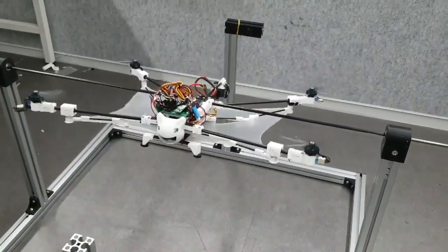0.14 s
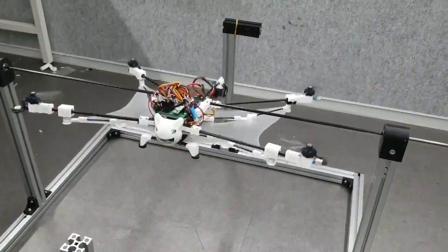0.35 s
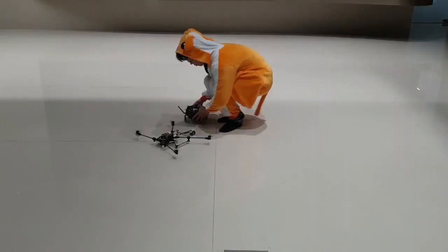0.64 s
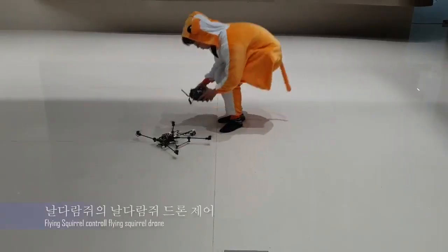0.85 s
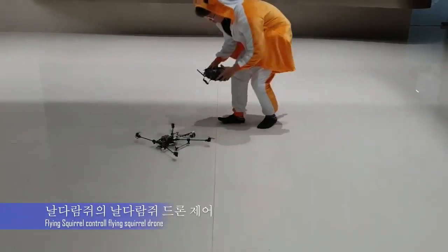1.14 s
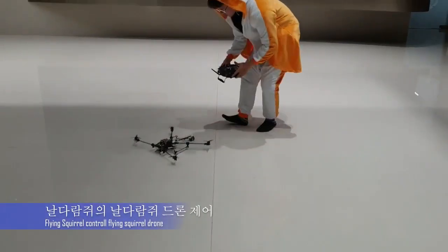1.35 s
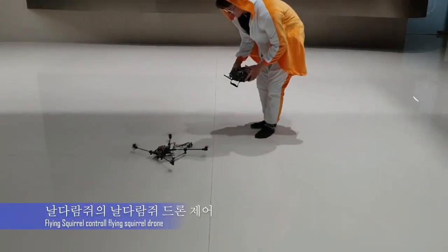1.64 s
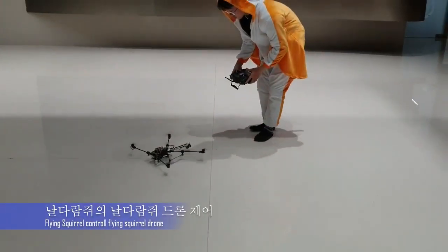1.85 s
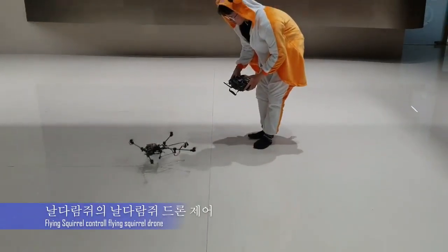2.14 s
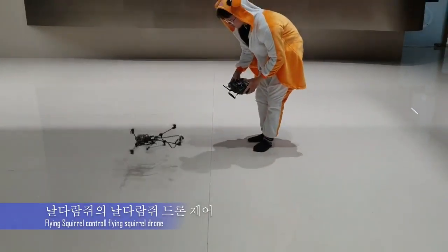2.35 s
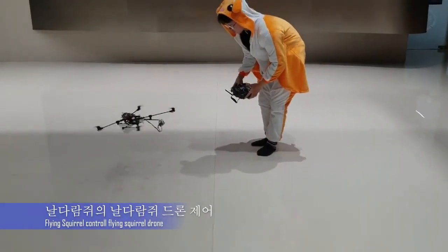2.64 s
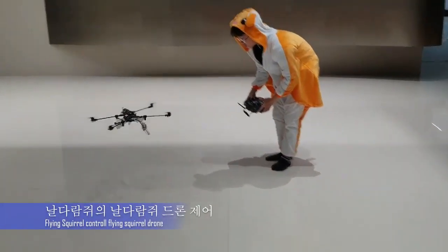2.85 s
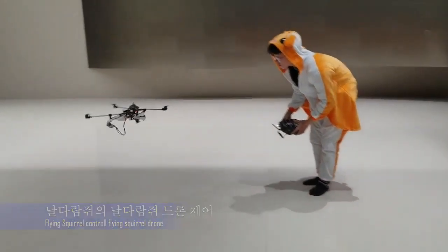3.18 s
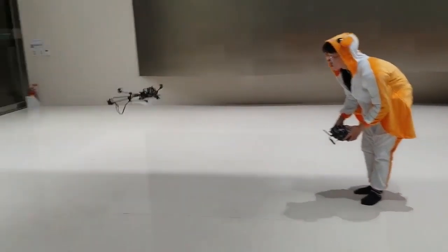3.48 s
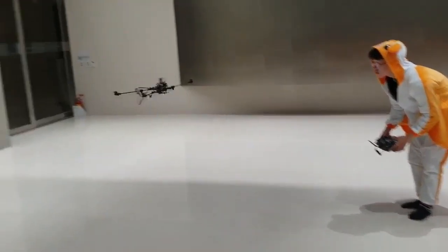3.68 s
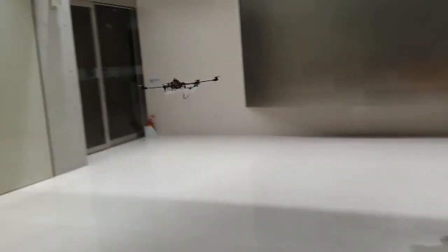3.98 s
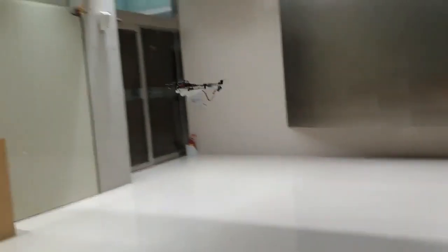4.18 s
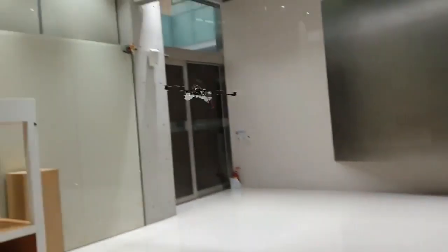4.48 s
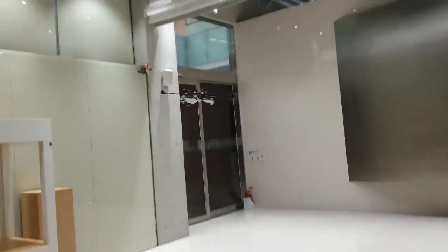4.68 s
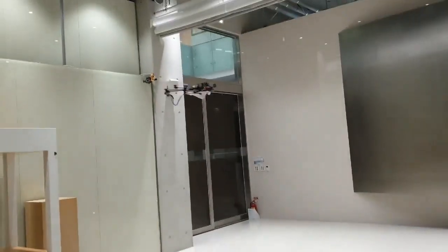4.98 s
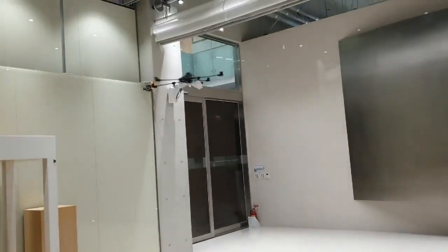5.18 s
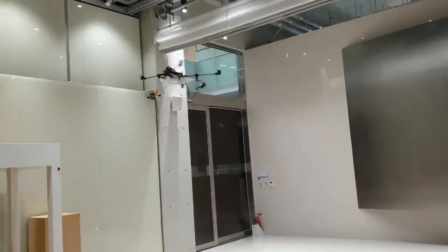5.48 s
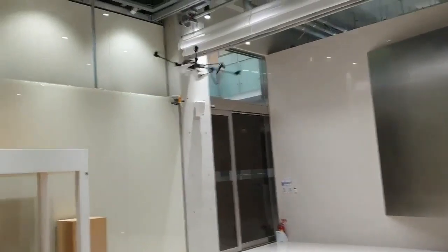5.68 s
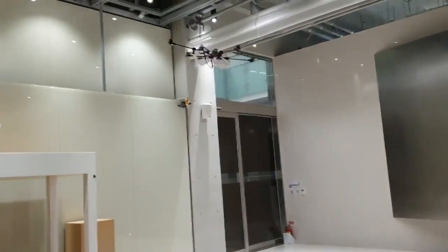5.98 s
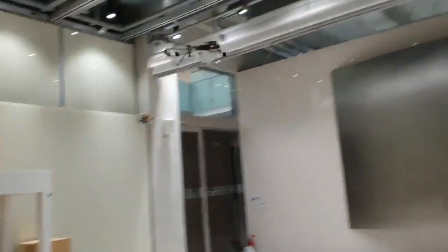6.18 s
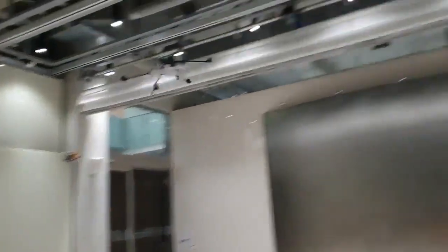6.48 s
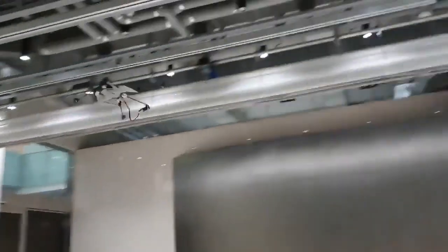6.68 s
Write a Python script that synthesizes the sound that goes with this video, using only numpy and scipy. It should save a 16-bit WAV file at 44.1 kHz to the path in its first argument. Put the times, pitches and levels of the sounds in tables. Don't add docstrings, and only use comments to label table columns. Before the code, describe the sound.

A four-rotor drone buzzes close to the microphone, its unsteady whine covered by bright hiss, then cuts off abruptly. In a large hard-walled hall, faint ventilation, hum and motor whine remain, with one tiny rotor blip. The rotors then spin up rapidly into a loud whining buzz, lift off and settle into wavering flight with airy hiss. A firm low handling thud comes near the end, and flight continues to the cut.

```python
import sys
import numpy as np
from scipy import signal
from scipy.fft import rfft, irfft
from scipy.io import wavfile

SR = 44100
rng = np.random.default_rng(int(sys.argv[2]) if len(sys.argv) > 2 else 0)


def transcribe(signal):
    frames = np.atleast_2d(signal).T
    limited = np.clip(frames, -1, 1)
    pcm = np.round(limited * 32767).astype(np.int16)
    wavfile.write(sys.argv[1], SR, pcm)


def gain_from_db(level_db):
    decades = np.asarray(level_db, float) / 20
    return 10 ** decades


N = 301203
TIME = np.arange(N) / SR
HZ = np.maximum(np.fft.rfftfreq(N + 1, 1 / SR), 1)
HOVER_DB = -32.5
LIFT_S = 2.67

# time_s, loudness_db
FLIGHT = [(1.45, -86.5), (1.57, -57.5), (1.66, -44), (1.78, -33.5), (1.92, -29), (2.15, -29.5), (2.5, -30),
          (2.78, -31.5), (3.05, -34), (3.45, -34.5), (4.15, -34.5), (4.6, -35), (5.1, -34.5), (5.35, -33.5),
          (5.58, -31.5), (6.1, -32.5), (6.55, -32.5), (6.83, -32.5)]


def rms_one(x):
    return x / np.sqrt(np.mean(x ** 2) + 1e-20)


def in_time(rows):
    s, *columns = np.transpose(rows)
    return [np.interp(TIME, s, column) for column in columns]


def at_hz(points, hz):
    pitch_hz, level_db = np.transpose(points)
    return np.interp(np.log(hz), np.log(pitch_hz), level_db, left=-90, right=-90)


def ramp(s, length_s):
    return np.clip((TIME - s) / length_s + .5, 0, 1)


def bells(events):
    return sum(height * np.exp(-(2 * (TIME - s) / length) ** 2) for s, length, height in events)


def drift(rate):
    r = np.exp(-80 * np.pi * rate / SR)
    slow = signal.lfilter([1], [1, -2 * r, r * r], rng.standard_normal(N // 40 + 2002))[2000:]
    return np.interp(np.arange(N) / 40, np.arange(len(slow)), rms_one(slow - slow.mean()))


def stereo_white():
    # pitch_hz, likeness (1 is the same)
    likeness = [(30, 0.2), (60, 0.72), (130, 0.96), (290, 0.92), (640, 0.33), (1410, 0.18), (3100, 0.04),
                (6820, -0.02), (15000, -0.0)]
    pitch_hz, share = np.transpose(likeness)
    alike = np.clip(np.interp(np.log(HZ), np.log(pitch_hz), share), 0, 1)
    mid, side = rfft(rng.standard_normal((2, N + 1)))
    return np.sqrt(1 + alike) * mid + np.sqrt(1 - alike) * side * [[1], [-1]]


def air(colour, gust_db, patchy_db):
    spectrum = stereo_white() * gain_from_db(at_hz(colour, HZ))
    gust = drift(10.0)
    low, high = np.log2(colour[0][0]), np.log2(colour[-1][0])
    out = 0
    for octave in np.arange(low, high + 1):
        band = np.clip(1 - np.abs(np.log2(HZ) - octave), 0, 1)
        noise = irfft(spectrum * band, N + 1)[:, :N]
        out = out + noise * gain_from_db(gust_db * gust + patchy_db * drift(14.0))
    return rms_one(out)


def reverb(x, t60_s, wet_db):
    shares = np.array([drift(1.5) for _ in range(3)])
    shares = shares / np.sqrt(np.sum(shares ** 2, axis=0))
    wet = 0
    for share in shares:
        tail = irfft(stereo_white(), N + 1)[:, :SR] * gain_from_db(-60 * TIME[:SR] / t60_s)
        tail = tail / np.sqrt(np.mean(np.sum(tail ** 2, axis=1)))
        wet = wet + signal.oaconvolve((x * share)[None], tail, axes=1)[:, :N]
    direct = np.array([x, np.roll(x, 2)])
    return (direct + gain_from_db(wet_db) * wet) / np.sqrt(1 + gain_from_db(2 * wet_db))


def rotor(blade_hz, orders, trim, flutter_db):
    speed = blade_hz * (1 + trim * (.6 * drift(8) + drift(30)))
    turn = 2 * np.pi * (np.cumsum(speed) / SR + rng.random())
    out = 0
    for k, db in orders:
        level = np.sqrt(2) * gain_from_db(db + flutter_db * k ** .3 * drift(20 * k))
        out = out + level * np.sin(k * turn + k * k)
    return out


def frame_drone():
    # time_s, blade_hz, level_db
    fast = [(0, 927, -34), (0.051, 860, -38.5), (.1, 880, -36), (.14, 902, -36), (.18, 869, -39),
            (.25, 848, -31), (.3, 881, -40), (.38, 900, -41.5), (.42, 865, -41), (.46, 836, -33.5),
            (.5, 852.5, -40.5), (.54, 890, -40.5), (.58, 929, -35.5), (.63, 903, -37.5), (.67, 898, -45),
            (.72, 906, -47.5)]
    slow = [(0, 822.4, -36), (.06, 799.4, -37), (.1, 762.4, -44), (.15, 770, -49.5), (.2, 733, -47),
            (.26, 756, -44), (0.301, 771, -44.5), (.34, 782, -44.5), (.4, 759, -48.5), (.46, 774, -40.5),
            (.5, 766, -40.5), (.54, 701, -46.5), (.59, 619.5, -46.5), (0.628, 703, -46), (.67, 737, -44),
            (.72, 795, -42)]
    middle = [(0, 780, -50), (.08, 745, -45), (.14, 827, -43), (.22, 900, -56.5), (.3, 838, -43),
              (.38, 841, -41.5), (0.419, 927, -45.5), (.5, 903, -52.5), (.54, 922, -45), (.58, 798, -51.5),
              (.62, 779, -39.5), (.66, 819, -37.5), (0.722, 858, -40.5)]
    # multiple of the blade rate, level_db
    blade_orders = [(1, -0.5), (2, -4), (3, -2.5), (4, -5.5), (5, -2.5), (6, -3), (7, -6)]
    shaft_orders = [(1 / 3, -27), (2 / 3, -20), (4 / 3, -23), (5 / 3, -18), (8 / 3, -15)]
    # pitch_hz, level_db
    hiss_colour = [(700, -22.5), (1200, -21.5), (2000, -10.5), (2900, -9), (3800, -6.5), (5500, -2.5),
                   (7000, 0), (8200, -3), (12000, -1.5), (15500, -1)]
    wash_colour = [(15, -47), (25, -17.5), (65, -4.5), (220, -12), (279, -9.5), (530, -14), (700, -5),
                   (910, -24), (1540, -120)]
    tones = 0
    for track, over_db in ((fast, -2), (slow, -2), (middle, 1)):
        hz, db = in_time(track)
        orders = [(k, level_db + over_db * (k > 1)) for k, level_db in [*blade_orders, *shaft_orders]]
        tones = tones + gain_from_db(db - 0.5) * rotor(hz, orders, trim=.008, flutter_db=4.0)
    swing_db = 1 * ramp(.35, 0.17)
    hiss = gain_from_db(-22 + swing_db) * air(hiss_colour, gust_db=.3, patchy_db=.7)
    wash = gain_from_db(-52) * air(wash_colour, gust_db=1.5, patchy_db=3.0)
    cut_s, step_db, fade_s, tones_duck_db = .7125, -7, .0185, -8.5
    cut = np.where(TIME < cut_s, 1, gain_from_db(step_db) * np.clip(1 - (TIME - cut_s) / fade_s, 0, 1))
    tones = reverb(tones * (TIME < .74), t60_s=.3, wet_db=-1) * gain_from_db(tones_duck_db * (TIME > cut_s))
    return (tones + hiss + wash) * cut


def above_hover_db():
    return in_time(FLIGHT)[0] - HOVER_DB


def room_air():
    # pitch_hz, level_db
    vent_colour = [(20, -14), (35, -10), (58, 2), (75, 2), (95, 0), (150, 0), (220, -40)]
    still_colour = [(150, -16), (200, -7.5), (235, 5), (300, -4), (550, -13.5), (1000, -24), (1700, -19.5),
                    (4000, -26), (8000, -40), (9500, -35), (12000, -30), (15000, -34)]
    stirred = gain_from_db(np.minimum(above_hover_db(), 0) / 2)
    vent = gain_from_db(-72 + 10 * stirred) * air(vent_colour, gust_db=-2.5, patchy_db=5.5)
    return vent + gain_from_db(-73) * air(still_colour, gust_db=.5, patchy_db=.5)


def mains_hum():
    stirred = gain_from_db(np.minimum(above_hover_db(), 0) / 2)
    hum_db = -80 + 12.5 * stirred + 7 * ramp(3.234, 0.54)
    wave = np.sin(2 * np.pi * 120 * TIME + np.array([[0], [.35]]))
    return np.sqrt(2) * gain_from_db(hum_db + 2.4 * drift(7.4)) * wave


def idle_motors():
    # pitch_hz, width_hz, level_db
    whines = [(1240, 80, -92), (1776, 200, -88)]
    # pitch_hz, level_db
    switching = [(10110, -94), (14000, -84)]
    whine = 0
    for hz, width_hz, db in whines:
        line = stereo_white() / (1 + ((HZ - hz) / width_hz * 2) ** 2)
        whine = whine + gain_from_db(db + 3.0 * drift(8)) * rms_one(irfft(line, N + 1)[:, :N])
    lines = 0
    for hz, db in switching:
        wave = np.sin(2 * np.pi * hz * TIME + np.array([[0], [1.2]]))
        lines = lines + gain_from_db(db + 3 + 1.5 * drift(15)) * wave
    resting = ramp(1.26, .15) - ramp(1.48, .15)
    blip_db = bells([(1.035, .3, 6)])
    return whine * gain_from_db(10 + blip_db - 17.5 * resting) + lines


def rotor_air():
    # pitch_hz, level_db
    hiss_colour = [(2500, -12.5), (3500, -13), (5000, -2), (7400, 2), (8200, -2.5), (12000, 0.5),
                   (15500, 0)]
    rush_colour = [(800, -11), (1100, -8), (2100, -8), (2600, -3), (3500, -2.5), (4500, -4.5),
                   (6000, -16.5)]
    wash_colour = [(130, -28), (200, 0.5), (350, 0), (600, 2.5), (750, 5.5), (1000, -15.5)]
    blip_s, rise_db_per_s, fall_db_per_s = 1.035, 87, 107
    blip = gain_from_db(-57.5 + np.minimum(rise_db_per_s * (TIME - blip_s), fall_db_per_s * (blip_s - TIME)))
    swing_db = above_hover_db()
    extra_db = np.maximum(swing_db, 0)
    thrust_db = np.minimum(swing_db, 0) + 0.54 * (TIME - LIFT_S)
    hiss = (gain_from_db(HOVER_DB + swing_db) + blip * gain_from_db(-3)) * gain_from_db(4.0)
    ground_db = -1.5 * (1 - ramp(3.4, 1))
    rush = gain_from_db(-37 + ground_db + thrust_db + 0.9 * extra_db) + blip
    wash = gain_from_db(-50.5 + thrust_db + 0.11 * extra_db)
    return (hiss * air(hiss_colour, gust_db=0.5, patchy_db=.9)
            + rush * air(rush_colour, gust_db=0.4, patchy_db=1.5)
            + wash * air(wash_colour, gust_db=1.0, patchy_db=3.0))


def hall_rotors():
    # time_s, loaded_pair_hz, level_db, light_pair_hz, level_db
    spin_up = [
        (1.45, 420, -110, 415, -112),
        (1.57, 540, -75, 527.5, -77),
        (1.66, 660, -51, 625, -64.5),
        (1.769, 809.4, -41, 749.5, -36),
    ]
    # time_s, blade_hz, level_db
    loaded_pair = [(1.84, 881.5, -35), (1.89, 899, -41), (1.96, 906, -34), (2.01, 908, -31),
                   (2.11, 944.6, -45), (2.18, 941, -31.5), (2.25, 937, -46), (2.31, 929, -34.5),
                   (2.5, 920, -40), (2.56, 920, -33.5), (2.61, 922, -36), (2.72, 913, -42),
                   (2.78, 914, -40), (2.83, 917, -37), (2.92, 907.5, -38), (3.03, 912, -38),
                   (3.13, 908.6, -42.5), (3.18, 911, -38.5), (3.23, 919, -46), (3.27, 912, -38),
                   (3.35, 934, -40.5), (3.41, 937, -49), (3.49, 937, -37.5), (3.57, 921, -38.5),
                   (3.7, 919, -39), (3.74, 946, -48), (3.79, 947, -39), (3.94, 944, -42), (4.0, 925, -43),
                   (4.04, 926, -45), (4.09, 932, -36), (4.18, 929.4, -39.5), (4.33, 931, -41),
                   (4.37, 916, -41), (4.47, 907, -40), (4.58, 913, -41.5), (4.64, 909, -42),
                   (4.7, 906, -42), (4.77, 904.6, -43), (4.88, 897.6, -40), (5.03, 892, -35),
                   (5.12, 887, -48), (5.24, 885, -42.5), (5.31, 886, -45), (5.35, 890.5, -34.5),
                   (5.4, 896, -42), (5.46, 910, -40), (5.53, 920.4, -33.5), (5.6, 927, -33),
                   (5.78, 931.4, -44), (5.87, 933.5, -36.5), (5.95, 935, -44), (6.08, 937.5, -31.5),
                   (6.24, 939, -38), (6.3, 933, -30.5), (6.37, 937, -39), (6.46, 935, -44),
                   (6.52, 920.4, -30), (6.58, 897, -33.5), (6.8, 896, -51.5)]
    light_pair = [(1.84, 764, -37), (1.91, 799, -39), (2.05, 829, -34.5), (2.13, 832, -36),
                  (2.26, 816, -45.5), (2.33, 824, -39), (2.45, 824, -44), (2.49, 807, -35),
                  (2.55, 807, -33.5), (2.71, 802, -39), (2.81, 805, -33), (2.86, 816, -44.5),
                  (2.92, 821, -40), (3.09, 821, -40.5), (3.13, 810, -43), (3.2, 810, -48), (3.25, 832, -44),
                  (3.35, 832, -42), (3.45, 805, -41), (3.53, 805, -43), (3.57, 805, -47), (3.62, 805, -43),
                  (3.68, 805, -43), (3.73, 805, -41), (3.98, 816, -49), (4.04, 851, -41),
                  (4.08, 851, -38.5), (4.15, 821, -40.5), (4.2, 821, -46.5), (4.29, 821, -40),
                  (4.38, 834, -41), (4.43, 834, -43), (4.5, 826, -45), (4.54, 824, -46), (4.67, 797, -42),
                  (4.73, 797, -46.5), (4.77, 786, -49), (4.84, 786, -38.5), (4.94, 778, -50),
                  (5.078, 781, -45.5), (5.14, 799, -40), (5.23, 786, -40.5), (5.27, 786, -53),
                  (5.39, 797, -37), (5.46, 829, -41.5), (5.56, 829, -36.5), (5.62, 837, -39),
                  (5.74, 824, -42.5), (5.79, 821, -33.5), (5.95, 816, -57.5), (6.08, 821, -38),
                  (6.26, 810, -45), (6.328, 829, -46), (6.37, 832, -45), (6.43, 832, -37), (6.5, 832, -47),
                  (6.6, 840, -36), (6.69, 834, -44), (6.74, 834, -49), (6.8, 834, -46)]
    # time_s, length_s, rise_db
    loaded_wobbles = [(3.42, .2, 21), (4.1, 0.46, 21), (4.42, .2, 15.5), (5.421, 0.42, 19), (5.717, .2, 11),
                      (6.183, 0.34, 17), (6.498, 0.19, 17.5), (6.749, 0.15, 15)]
    light_wobbles = [(1.8, .25, 20), (2.05, 0.25, 14), (2.7, 0.5, 17), (3.2, .3, 8), (3.42, 0.17, 14),
                     (3.85, 0.38, 18), (4.2, 0.41, 19), (4.55, 0.28, 15), (4.8, 0.32, 21.3),
                     (5.32, 0.39, 12.95), (5.95, 0.49, 14), (6.3, 0.29, 14.1), (6.55, 0.29, 14)]
    # time_s, length_s, share of speed
    loaded_strays = [(2.197, 0.31, .03), (2.599, 0.29, .04), (3.602, .3, -.035), (3.852, .2, -.04),
                     (4.749, 0.19, -.03), (6.701, .15, .05)]
    light_strays = [(1.88, .12, -0.067), (2.2, .4, -.06), (2.86, .36, -.075), (3.7, .2, .04),
                    (4.1, .3, -.05), (5.4, .15, -.06), (5.6, .15, -.05), (6.72, 0.34, -.05)]
    # multiple of the blade rate, level_db
    loaded_orders = [(2, -2), (3, -4), (4, -5), (5, -6), (6, -8), (7, -9)]
    light_orders = [(2, 1), (3, -1), (4, -3), (5, -4), (6, -6), (7, -6)]
    shaft_orders = [(2 / 3, -26), (4 / 3, -21), (5 / 3, -16), (7 / 3, -16), (8 / 3, -15)]
    loud_db, = in_time(FLIGHT)
    spool_db = np.minimum(loud_db - HOVER_DB, 0)
    effort_db = loud_db - 9 + 0.26 * spool_db
    floor_db, free_db, climb_db_per_s = -3.5, -14, -27
    climb_db = np.clip(floor_db + climb_db_per_s * (TIME - LIFT_S), free_db, floor_db)
    overtones_db = effort_db + climb_db + 0.33 * spool_db
    tones = 0
    for column, pair, wobbles, strays, overtones in (
            (1, loaded_pair, loaded_wobbles, loaded_strays, loaded_orders),
            (3, light_pair, light_wobbles, light_strays, light_orders)):
        hz, blade_db = in_time([(row[0], *row[column:column + 2]) for row in spin_up] + list(pair))
        imbalance_db = effort_db - 28.5 + bells(wobbles) + 2.5 * drift(8.1)
        orders = [(1, blade_db - 1), (1 / 3, imbalance_db)]
        orders += [(k, effort_db + db) for k, db in shaft_orders]
        orders += [(k, overtones_db + db) for k, db in overtones]
        partner_stray = .02 * drift(4) + bells(strays)
        for stray, own_db in ((0, 0), (partner_stray, -3.5)):
            own_orders = [(k, db + own_db) for k, db in orders]
            tones = tones + rotor(hz * (1 + stray), own_orders, trim=.01, flutter_db=3.0)
    return reverb(tones * (TIME > FLIGHT[0][0]), t60_s=.5, wet_db=4.5)


def bumps():
    # start_s, level_db, pitch_hz
    knocks = [
        (5.058, -56, 54.54),
        (6.055, -37.5, 48.9),
    ]
    out = 0
    for s, db, hz in knocks:
        age = np.clip(TIME - s, 0, None)
        out = out + gain_from_db(db) * np.sin(2 * np.pi * hz * age) * np.exp(-age / 0.033)
    return out * gain_from_db([[6], [-8]])


def hall():
    fade_in = np.clip((TIME - .715) / 0.028, 0, 1)
    return (room_air() + mains_hum() + idle_motors() + rotor_air() + hall_rotors() + bumps()) * fade_in


def scene():
    both = (frame_drone() + hall()) * gain_from_db((-0.6 + 0.08 * TIME) * [[1], [-1]])
    treble = signal.butter(2, 8000, "high", fs=SR, output="sos")
    both[0] -= 0.42 * signal.sosfilt(treble, both[0])
    return both


def low_pass(x):
    return signal.sosfilt(signal.butter(12, 16810, fs=SR, output="sos"), x)


def record(dry):
    dip_hz, width_hz, depth = 1008, 70, .8
    b, a = signal.iirpeak(dip_hz, dip_hz / width_hz, fs=SR)
    dipped = dry - depth * signal.lfilter(b, a, dry)
    return low_pass(dipped)


dry = scene()
out = record(dry)
transcribe(out)
```